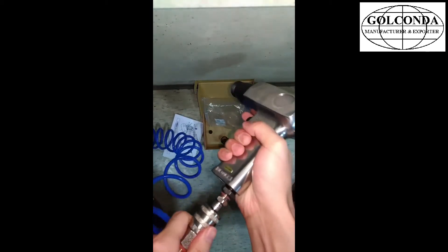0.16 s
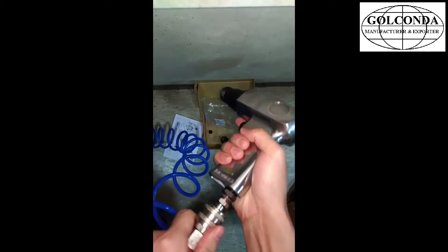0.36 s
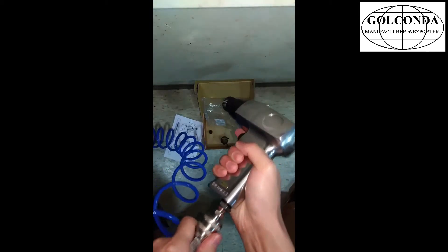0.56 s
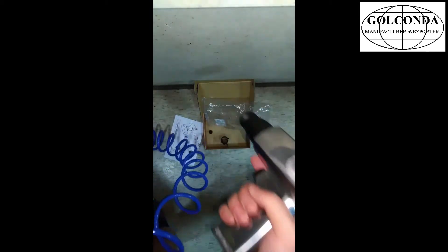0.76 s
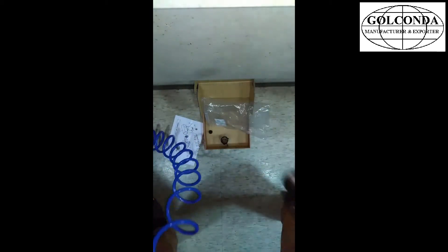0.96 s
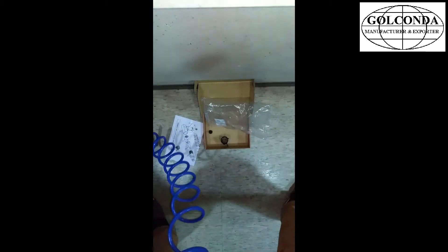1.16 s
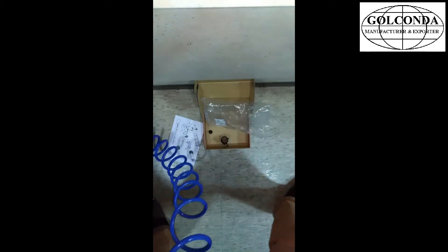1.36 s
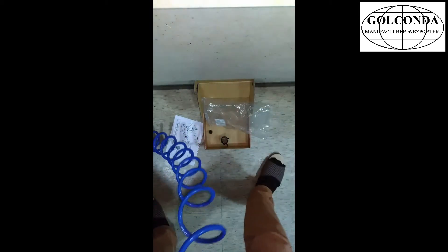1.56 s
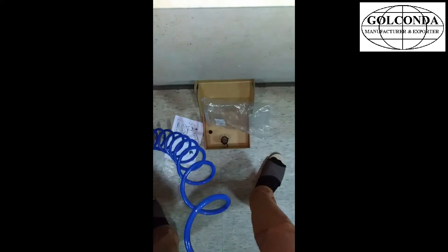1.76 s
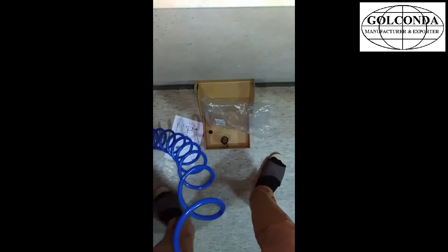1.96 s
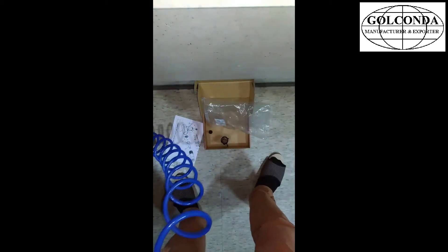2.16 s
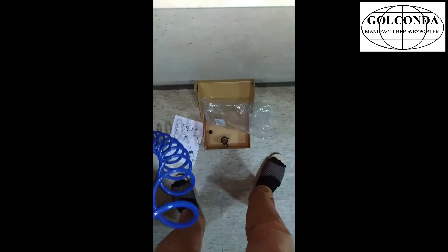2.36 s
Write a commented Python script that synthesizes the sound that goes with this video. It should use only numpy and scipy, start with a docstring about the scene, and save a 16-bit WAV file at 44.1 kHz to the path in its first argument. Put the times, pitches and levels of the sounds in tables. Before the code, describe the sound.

In a bare workshop, compressed air blasts briefly from a hose coupler and hits the nearby microphone with a low thump. Then the tool clacks, clothes rustle, a sandal steps and steel clinks over faint room hum.

```python
"""A bare workshop, where an air hose coupler is pulled off an impact wrench. The trapped air hisses out,
the plug pops free, and the jet buffets the right microphone, which swings back with a low thump.
The loose coupler sleeve ticks and the tool clacks in the hand. Clothes rustle, a sandal steps aside
and steel clinks once against steel. Underneath lie room rumble, the hum of a distant motor and a faint
leak at the hose end."""
import sys
import numpy as np
from scipy import signal
from scipy.fft import rfft, irfft, next_fast_len
from scipy.io import wavfile
from scipy.ndimage import uniform_filter1d, map_coordinates

SR = 44100
rng = np.random.default_rng(int(sys.argv[2]) if len(sys.argv) > 2 else 0)


def master_out(mix):
    """Clip the mix to full scale and print it as 16-bit PCM to the path in sys.argv[1]."""
    frames = np.transpose(np.atleast_2d(mix))
    ceiling = np.clip(frames, -1, 1)
    pcm = np.round(ceiling * 32767).astype(np.int16)
    wavfile.write(sys.argv[1], SR, pcm)


N = 105840

# envelope of the escaping air (time [s], level [dB], extra level on the left [dB])
JET_FLOW = [(.2, -54, 2), (.218, -16, 2), (.233, -7, 2), (.24, -1.5, 3.5), (.26, 0.5, -2), (.305, -3, 5.5),
            (.338, 0.5, 5.5), (.352, -8, 18), (.385, -24, 11), (.43, -26, 12), (.5, -54, 10)]
# hiss of the jet (frequency [Hz], left [dB/Hz], right [dB/Hz])
JET_HISS = [(60, -88, -65), (280, -99, -63.5), (560, -99, -67.5), (1040, -79, -69.5), (1900, -85, -63.5),
            (3240, -75.5, -61.5), (6000, -73, -58.5), (7700, -75, -55), (10900, -71, -56.5),
            (14800, -70, -54.5)]
# envelope of the wind on the right microphone (time [s], buffeting [dB], eddies [dB])
GUST_LEVELS = [(.238, -46, -45), (.261, -15, -20), (.267, 3.5, -7.5), (.279, -1.5, -6.5), (.293, -5, 1.5),
               (.328, -12.5, -1.5), (.338, -0.5, -5), (.343, -9, -18), (.355, -46.5, -53)]
# slow, bassy buffeting (frequency [Hz], level [dB/Hz])
BUFFET_SPECTRUM = [(25, -57), (55, -46), (100, -40), (145, -48), (198, -31), (250, -52), (335, -41),
                   (545, -43), (900, -67)]
# fast, crackling eddies (frequency [Hz], level [dB/Hz])
EDDY_SPECTRUM = [(40, -57), (250, -50.5), (500, -46), (800, -47), (1300, -46), (2000, -53), (3500, -53.5),
                 (7000, -60.5), (15000, -106)]
# cues for the loose coupler sleeve (time [s], level [dB], attack [s])
TICK_CUES = [(0.4058, 5, 0.00024), (0.418, 4.5, 0.0014)]
# colour of a tick (frequency [Hz], left [dB/Hz], right [dB/Hz])
TICK_SPECTRUM = [(900, -93, -82), (2010, -75, -68.5), (5000, -73, -71), (7800, -79, -68), (15000, -75, -66)]
# body modes of the tool (frequency [Hz], level [dB])
TOOL_MODES = [(950, -23), (1550, -25.5), (2000, -22.5), (2500, -29.5), (2930, -20), (3600, -29)]
# contact noise of the clack (frequency [Hz], left [dB/Hz], right [dB/Hz])
TOOL_CRACK = [(300, -80, -85), (645, -63, -69), (985, -52, -51), (1400, -80, -58), (2920, -60, -47.5),
              (4500, -78, -83), (5840, -74, -64), (6550, -63, -50), (8200, -67, -56), (11500, -80, -64.5),
              (15000, -75, -59)]
# ringing modes of the steel (frequency [Hz], level [dB], t60 [s])
STEEL_MODES = [(3150, -22.5, 0.0074), (4295, -26.5, 0.25), (4450, -38, 0.09), (6800, -44, 0.037),
               (9986, -35.5, 0.072)]
# contact noise of the clink (frequency [Hz], left [dB/Hz], right [dB/Hz])
STEEL_CRACK = [(400, -65.5, -63), (1410, -69, -71), (2100, -68, -70), (3120, -66, -55.5), (5500, -86, -68),
               (7000, -75, -76), (15000, -82, -82)]
# swishes of clothing (peak time [s], half length [s], level [dB])
RUSTLE_CUES = [(0, 0.047, -9), (1.403, 0.026, -4.5), (1.514, 0.034, 1.5), (1.847, 0.035, -2.5),
               (2.077, 0.03, -4.5)]
# colour of the cloth (frequency [Hz], left [dB/Hz], right [dB/Hz])
RUSTLE_SPECTRUM = [(400, -81.5, -92), (1500, -94.5, -92), (2720, -81.5, -81), (4300, -88, -84.5),
                   (7600, -88, -84.5), (10900, -90, -92), (15100, -92, -108.5)]
# sandal contacts with the floor (time [s], thud [dB], scrape [dB], t60 [s])
STEP_CUES = [(1.542, 0.5, -34, 0.037), (1.579, -17, -38.5, 0.097), (1.614, -7, -40, 0.1),
             (1.636, -7.5, -61, 0.17)]
# thud of the sole (frequency [Hz], left [dB/Hz], right [dB/Hz])
THUD_SPECTRUM = [(70, -63, -79), (197, -50, -68), (378, -57, -63), (600, -66, -66), (890, -67.5, -85),
                 (1790, -80, -79), (6000, -90, -105)]
# room tone of the workshop (frequency [Hz], left [dB/Hz], right [dB/Hz])
RUMBLE_SPECTRUM = [(24.8, -91, -85), (60, -68.5, -76), (119, -69, -74), (223, -74.5, -76.5),
                   (493, -85, -86.5), (805, -85.5, -84), (1110, -86, -91.5), (1850, -97, -94),
                   (3720, -104, -102), (8000, -108, -108), (15000, -106, -112)]
# stereo image of the room tone (frequency [Hz], left-right correlation [0..1])
RUMBLE_CORRELATION = [(60, 0.93), (290, 0.95), (640, 0.54), (1400, 0.033), (3000, 0.23)]
# tones of the distant motor (frequency [Hz], level [dB])
MOTOR_TONES = [(682, -57.5), (707, -67.5)]
# envelope of the leak at the hose end (time [s], level [dB])
LEAK_FLOW = [(.3, -1.5), (.8, -5), (1.15, -1.5), (1.5, -0.5), (1.7, -2.5), (2.4, 1.5)]
# thin hiss of the leak (frequency [Hz], left [dB/Hz], right [dB/Hz])
LEAK_HISS = [(1000, -108, -106), (2580, -94, -100), (6000, -99, -92.5), (10600, -99, -91),
             (12900, -91, -92.5), (14200, -92, -85.5)]
# reverb time of the workshop (frequency [Hz], t60 [s])
ROOM_DECAY = [(200, .25), (1300, 0.49), (2800, 0.41), (5800, 0.61), (8000, 0.49), (15000, 0.28)]
# what the walls return of a hit (frequency [Hz], gain [dB])
WALL_EQ = [(900, 4.5), (2300, -4), (7000, -0.5), (15000, -6)]
# treble notch of the left microphone port (frequency [Hz], gain [dB])
LEFT_PORT_EQ = [(8200, -0.5), (10000, -16.5), (12000, -9), (16000, -15)]


def jet(flutter_db=1.16):
    """Trapped air rushes out: a turbulent hiss that follows the flow and swings left as it ends."""
    flow, left_boost = envelopes(JET_FLOW)
    hiss = patchy(noise(JET_HISS), depth_db=2.0)
    flutter = amp(flutter_db * wobble(152.0))
    return hiss * flow * flutter * np.array([left_boost, np.ones(N)])


def inlet_whistle(peak_s=0.343, half_length_s=0.038, level_db=-41):
    """The last of the air sounds a narrow resonance of the open inlet."""
    swell = np.exp(-((clock() - peak_s) / half_length_s) ** 2)
    return amp(level_db) * resonant_noise(centre_hz=1255, width_hz=46) * swell


def gust(eddies_per_s=2000, spiky=0.55):
    """The jet hits the right microphone port with slow lumps and sharp suction pulses."""
    slow, fast = envelopes(GUST_LEVELS)
    suction = -rng.uniform(0, 1, N) * (rng.random(N) < eddies_per_s / SR)
    eddies = unit(spiky * unit(suction - suction.mean()) + (1 - spiky) * rng.standard_normal(N))
    buffeting = coloured(rng.standard_normal(N), BUFFET_SPECTRUM)[0]
    wind = slow * buffeting + fast * coloured(eddies, EDDY_SPECTRUM)[0]
    return np.array([np.zeros(N), wind])


def microphone_thump(start=.3385, hz=54.7, t60=0.079, left_db=-19, right_db=1):
    """The diaphragm swings back with a low thump when the jet leaves it."""
    swing = -ring(start, [(hz, 0, t60)]) * rise(start, attack_s=0.0055)
    return amp([[left_db], [right_db]]) * swing


def plug_pop(start=.337, level_db=-3):
    """The plug clears the coupler: one sharp suction pulse on the right port."""
    return np.array([np.zeros(N), -amp(level_db) * pulse(start, length_s=0.00067)])


def tool_clack(start=.6212, snap_hz=9000, body_t60=.015):
    """The tool clacks: a hard snap, a short bright crack and body modes choked by the hand."""
    crack = amp(-0.5) * decay(start, t60=.011) * noise(TOOL_CRACK)
    snap = amp(-16) * pulse(start, length_s=1 / (2 * np.pi * snap_hz))
    body = ring(start, [(hz, db, body_t60) for hz, db in TOOL_MODES])
    return pan_right(snap + body, left_db=-11) + crack


def sleeve_ticks(t60=0.017):
    """The loose coupler sleeve gives a crisp tick, then a softer one."""
    envelope = sum(amp(db) * rise(start, attack) * decay(start, t60) for start, db, attack in TICK_CUES)
    return noise(TICK_SPECTRUM) * envelope


def steel_clink(start=2.3496, rebound_after_s=0.015, rebound_db=-5.5):
    """Steel touches steel and rings; after one rebound the parts rest together and damp the ring."""
    rebound_s = start + rebound_after_s
    damping = np.where(clock() < rebound_s, 1, decay(rebound_s, t60=.16))
    rebound = amp(rebound_db) * ring(rebound_s, STEEL_MODES[:1])  # duller: lowest mode only
    steel = damping * ring(start, STEEL_MODES) + rebound
    crack = decay(start, t60=0.014) * noise(STEEL_CRACK)
    return pan_right(steel, left_db=-0.5) + crack


def sandal_step(scrape_right_db=-18):
    """A sandal thuds and scrapes on the concrete, off to the left."""
    thud = noise(THUD_SPECTRUM)
    scrape = resonant_noise(centre_hz=1220, width_hz=124) * amp([[0], [scrape_right_db]])
    return sum((amp(thud_db) * thud + amp(scrape_db) * scrape) * rise(s, attack_s=.002) * decay(s, t60)
               for s, thud_db, scrape_db, t60 in STEP_CUES)


def cloth_rustle(grain_db=2):
    """Clothing moves in short, grainy swishes."""
    swishes = sum(amp(db) * np.exp(-((clock() - s) / half) ** 2 / 2) for s, half, db in RUSTLE_CUES)
    return patchy(noise(RUSTLE_SPECTRUM), depth_db=3.5) * swishes * amp(grain_db * wobble(200))


def rumble():
    """Steady room tone, nearly mono in the bass and wide higher up."""
    def mid_side_gains(hz):
        width = np.arccos(np.clip(along(RUMBLE_CORRELATION, hz)[0], -1, 1)) / 2
        return np.array([np.cos(width), np.sin(width)])

    mid, side = filtered(rng.standard_normal((2, N)), mid_side_gains)
    return coloured(np.array([mid + side, mid - side]), RUMBLE_SPECTRUM)


def motor_hum(waver_db=.8, drift_rad=.55, flutter_per_s=16):
    """A distant motor hums on two close tones, slightly rough in level and phase."""
    return sum(amp(db + waver_db * wobble(flutter_per_s))
               * np.sin(2 * np.pi * hz * clock() + drift_rad * wobble(flutter_per_s))
               for hz, db in MOTOR_TONES)


def hose_leak():
    """Air seeps from the hose end in a faint, airy hiss."""
    return patchy(noise(LEAK_HISS), depth_db=3.5) * envelopes(LEAK_FLOW)


def reverb(x, t60s, predelay_samples=150):
    """Diffuse stereo tail fed from the right channel; t60s sets how fast each frequency dies."""
    hz, t, spectra = signal.stft(rng.standard_normal((2, SR // 2)), SR, nperseg=256)
    fade = np.exp(-np.log(1000) * t / along(t60s, hz).T)
    tail = signal.istft(spectra * fade, SR, nperseg=256)[1]
    tail = np.pad(tail, ((0, 0), (predelay_samples, 0)))
    return signal.fftconvolve(x[1:], tail / np.linalg.norm(tail[0]), axes=1)[:, :N]


def pan_right(x, left_db, lag_s=0.00026):
    """A sound on the right reaches the left microphone later and weaker."""
    delayed = filtered(x, lambda hz: np.exp(-2j * np.pi * hz * lag_s))
    return np.array([amp(left_db) * delayed, x])


def ring(start, modes):
    """Damped modes struck together, alternating in polarity."""
    return sum((-1) ** k * amp(db) * decay(start, t60) * np.sin(2 * np.pi * hz * (clock() - start))
               for k, (hz, db, t60) in enumerate(modes))


def pulse(start, length_s):
    """A sharp push followed by a shallow pull."""
    age = (np.arange(N) - round(start * SR)) / SR
    progress = np.maximum(age, 0) / length_s
    return (age >= 0) * (1 - progress) * np.exp(-progress)


def patchy(x, depth_db):
    """Churning texture: the gain varies at random in small patches of time and frequency."""
    spectra = signal.stft(x, nperseg=512)[2]
    patches = uniform_filter1d(rng.standard_normal(spectra.shape), size=4, axis=1)
    patches = uniform_filter1d(patches, size=9, axis=2)
    gain = unit(amp(depth_db * unit(patches)))
    return signal.istft(spectra * gain, nperseg=512)[1][:, :N]


def resonant_noise(centre_hz, width_hz):
    """Stereo noise through one resonance, rms 1."""
    white = rng.standard_normal((2, N))
    return unit(filtered(white, lambda hz: 1 / (1 + ((hz - centre_hz) / width_hz) ** 2)))


def noise(spectrum):
    """Wide coloured noise, independent left and right."""
    return coloured(rng.standard_normal((2, N)), spectrum)


def coloured(white, spectrum):
    """Give a white signal of rms 1 a spectrum in dB/Hz."""
    return filtered(white, lambda hz: amp(along(spectrum, hz))) * np.sqrt(SR / 2)


def filtered(x, response):
    """EQ x with a response given as a function of frequency."""
    size = next_fast_len(N + SR // 2)
    return irfft(rfft(x, size) * response(np.fft.rfftfreq(size, 1 / SR)), size)[..., :N]


def along(rows, hz):
    """Read each column after the first on a log frequency axis."""
    knots_hz, *columns = np.transpose(rows)
    return np.array([np.interp(np.log(hz + 1), np.log(knots_hz + 1), column) for column in columns])


def envelopes(rows):
    """A gain curve for each dB column, silent before the first time."""
    times, *columns = np.transpose(rows)
    return amp([np.interp(clock(), times, column, left=-120) for column in columns])


def rise(start, attack_s):
    """A soft attack, opening from zero at start."""
    return 1 - np.exp(-((clock() - start) / attack_s) ** 2)


def decay(start, t60):
    """A hard onset, then a fall of 60 dB every t60 seconds."""
    age = clock() - start
    return (age >= 0) * np.exp(-np.log(1000) * np.maximum(age, 0) / t60)


def wobble(rate):
    """Smooth random modulation, rate knots a second."""
    return map_coordinates(rng.standard_normal(int(N * rate / SR) + 4), [clock() * rate])


def amp(db):
    """Decibels to gain."""
    return 10 ** (np.asarray(db) / 20)


def unit(x):
    """Scale to rms 1."""
    return x / np.sqrt(np.mean(x ** 2) + 1e-20)


def clock():
    """Time of each sample in seconds."""
    return np.arange(N) / SR


def scene(tick_send_db=-8, clink_send_db=-10):
    """The mix: air and hits feed the room's tail, and the hits also slap off the near walls."""
    air, clack, ticks, clink = jet(), tool_clack(), sleeve_ticks(), steel_clink()
    hit_send = clack + amp(tick_send_db) * ticks + amp(clink_send_db) * clink
    hit_send = filtered(hit_send, lambda hz: amp(along(WALL_EQ, hz)))
    tail = amp(-14) * reverb(air, ROOM_DECAY) + amp(-17.5) * reverb(hit_send, ROOM_DECAY)
    walls = amp(-6) * reverb(hit_send, [(1000, 0.14)])  # one short t60 at all frequencies
    release = air + inlet_whistle() + gust() + microphone_thump() + plug_pop()
    foley = clack + ticks + clink + sandal_step() + cloth_rustle()
    bed = rumble() + motor_hum() + hose_leak()
    return release + foley + tail + walls + bed


def record(dry, low_cut_hz=37, ceiling=.88, top_hz=16000):
    """The microphone chain: a treble notch on the left, a low cut, a soft clip and a high cut."""
    left = filtered(dry[0], lambda hz: amp(along(LEFT_PORT_EQ, hz)[0]))
    x = filtered(np.array([left, dry[1]]), lambda hz: hz ** 2 / np.sqrt(hz ** 4 + low_cut_hz ** 4))
    x = x / (1 + (x / ceiling) ** 8) ** (1 / 8)
    return filtered(x, lambda hz: hz < top_hz)


dry = scene()
out = record(dry)
master_out(out)
```